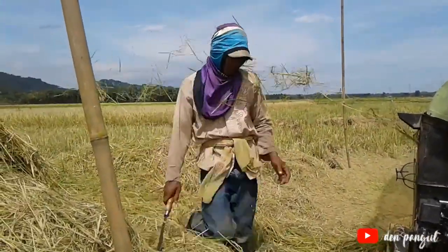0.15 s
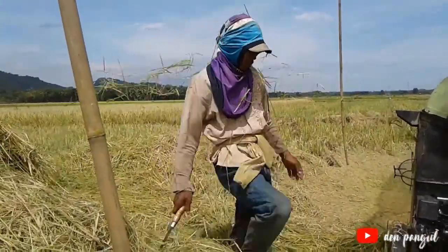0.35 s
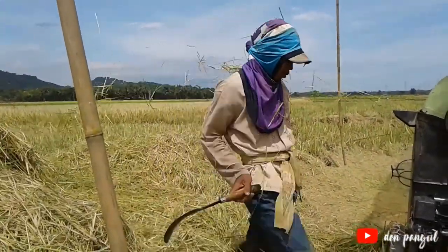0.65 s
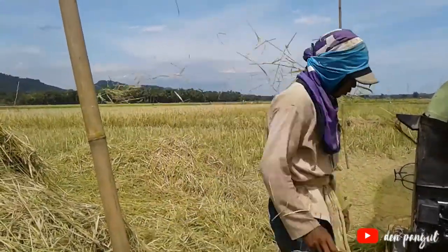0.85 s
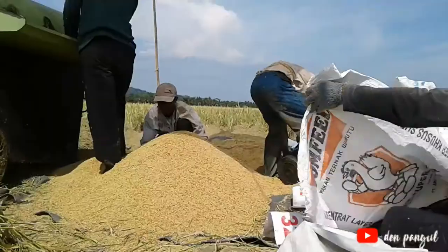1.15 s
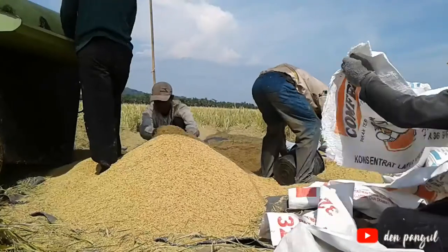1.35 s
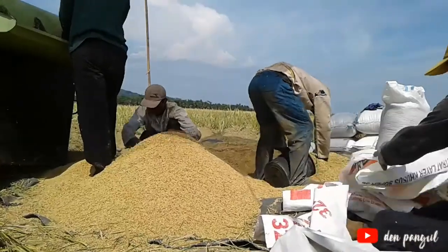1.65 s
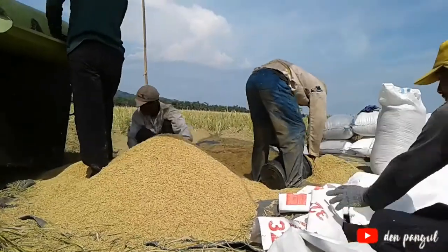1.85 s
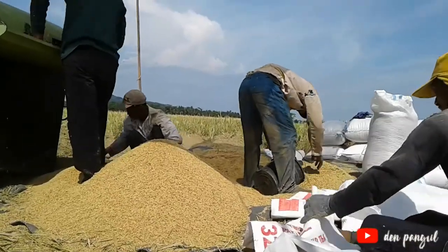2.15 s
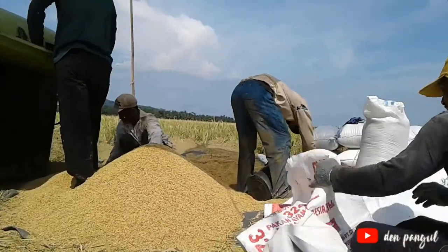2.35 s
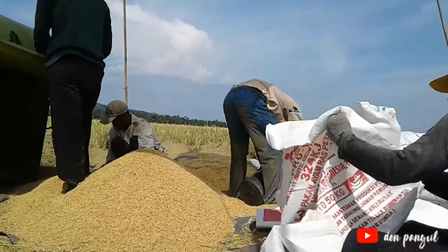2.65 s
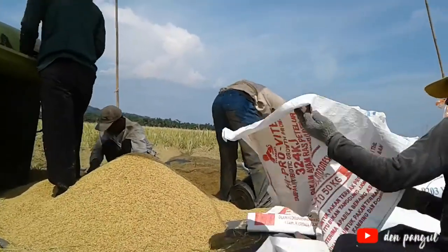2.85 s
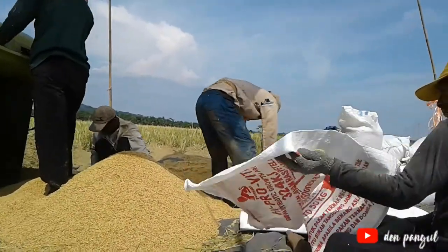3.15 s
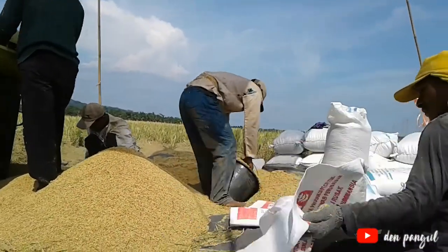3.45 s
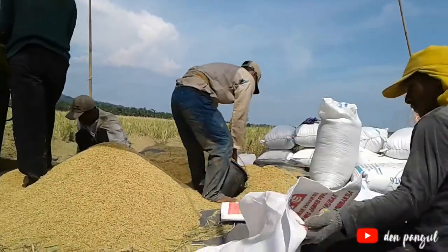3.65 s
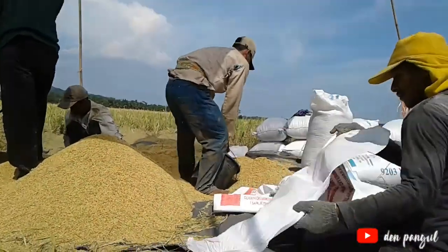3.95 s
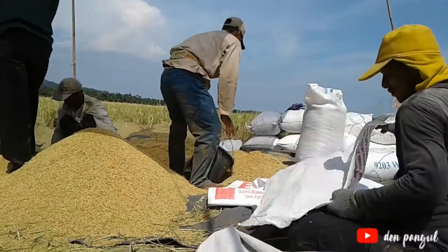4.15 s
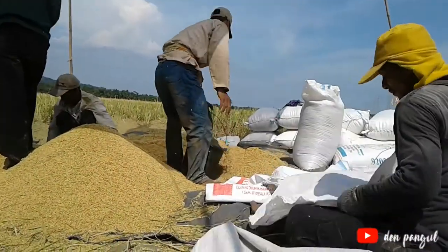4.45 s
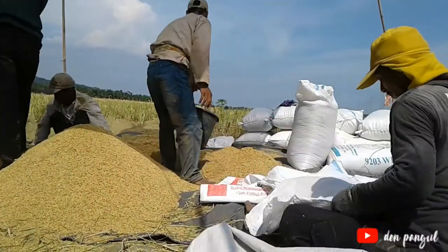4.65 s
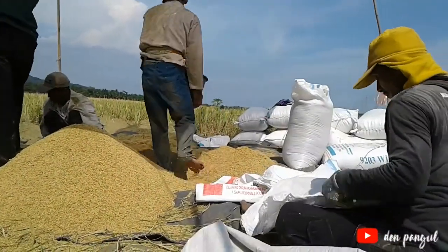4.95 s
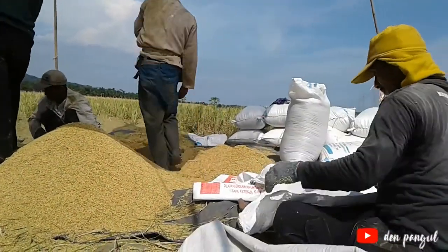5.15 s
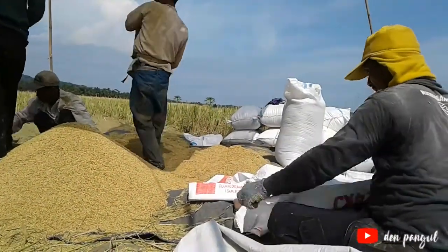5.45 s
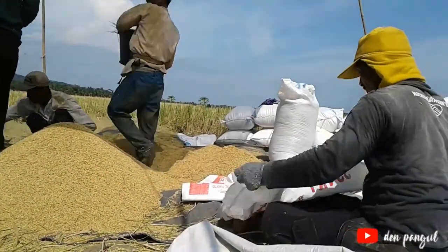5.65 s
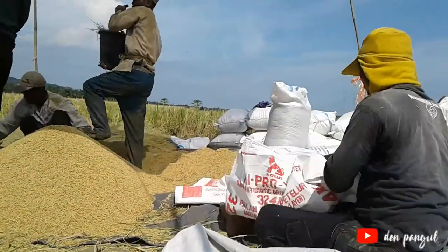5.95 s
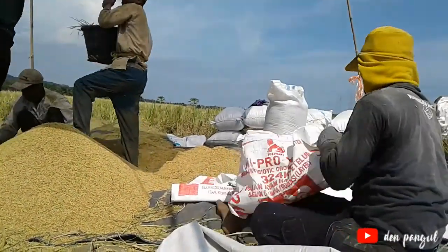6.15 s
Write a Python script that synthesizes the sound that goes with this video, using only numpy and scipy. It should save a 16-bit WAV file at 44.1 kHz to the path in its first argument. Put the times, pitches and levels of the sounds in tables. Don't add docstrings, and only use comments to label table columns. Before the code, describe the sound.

Loud engine-driven thresher rattles and clanks beside the straw outlet, stops dead, then returns as a steadier distant drone with pouring grain and plastic sack crackle.

```python
import sys
import numpy as np
from scipy import signal
from scipy.fft import rfft, irfft, next_fast_len
from scipy.io import wavfile
from scipy.ndimage import uniform_filter1d, map_coordinates

SR = 44100
rng = np.random.default_rng(int(sys.argv[2]) if len(sys.argv) > 2 else 0)


def store_wav(level_fs):
    pcm = np.round(np.clip(np.atleast_2d(level_fs), -1, 1) * 32767)
    wavfile.write(sys.argv[1], SR, pcm.T.astype(np.int16))


def natural_amplitude(level_db):
    exponent = np.asarray(level_db, float) / 20
    return 10 ** exponent


N = 277830
TIME = np.arange(N) / SR

# shaft_multiple, level_db
NEAR_ORDERS = [(1, -39), (2, -30), (3, -26.5), (4, -24.5), (5, -4), (6, -2.5), (7, -5), (8, 3.5), (9, -4),
               (10, 0.5), (11, -9.5), (12, -5), (13, -24.5), (14, -13), (15, -0.5), (16, -3.5), (17, -6),
               (18, -9), (19, -1), (20, -11), (21, -2), (22, -12), (23, 3.5), (24, -16)]
FAR_ORDERS = [(1, -42.5), (2, -36), (3, -26), (4, -21.5), (5, -17.5), (6, -9), (7, -4), (8, 0), (9, -14),
              (10, 2.5), (11, -2), (12, -2), (13, -8.5), (14, -9.5), (15, -17), (16, -11), (17, -14),
              (18, -11.5), (19, -27), (20, -11), (21, -21)]
FAR_HALF_ORDERS = [(0.5, -42), (1.5, -41), (2.5, -37), (3.5, -32), (4.5, -19), (5.5, -18.5), (6.5, -9),
                   (7.5, -4.5), (8.5, -6.5), (9.5, 0.5), (10.5, -2), (11.5, -13), (12.5, -13),
                   (13.5, -12.5), (14.5, -18), (15.5, -12), (16.5, -20), (17.5, -11), (18.5, -9),
                   (19.5, -12), (20.5, -18)]
# frequency_hz, density_db_per_hz
NEAR_ROAR = [(12, -70.5), (20, -39), (48, -29), (65, -14.5), (124, -2), (173, -10.5), (241, -3),
             (323, -5.5), (379, -2.5), (507, -10.5), (650, -17.5), (840, -46.5), (1430, -120)]
FAR_ROAR = [(12, -69), (20, -39), (54, -39), (73, -20), (93, -8.5), (151, -3.5), (181, -5.5), (205, -12.5),
            (264, -10), (307, -13), (343, -14.5), (429, -19.5), (550, -28), (720, -40), (1210, -120)]
OUTLET = [(250, -62.5), (330, -18), (370, -9), (388, -5), (410, -14.5), (470, -15.5), (600, -44.5)]
# frequency_hz, density_db_per_hz
NEAR_RATTLE = [(350, -31.5), (600, -14), (637, -10.5), (697, -4.5), (763, -7.5), (822, -2.5), (1160, -2.5),
               (1240, -5), (1410, -10), (1610, -5), (2020, -9), (2350, -4), (2530, -9), (3120, -12),
               (3600, -20.5), (4680, -45.5), (7920, -120)]
FAR_RATTLE = [(250, -120), (400, -33), (520, -3), (700, -1.5), (960, -1.5), (1350, -0.5), (1700, 2),
              (2230, 1.5), (2500, -6), (3000, -12), (3300, -43), (4500, -120)]
# frequency_hz, density_db_per_hz
NEAR_CHAFF = [(2000, -36), (3400, -3.5), (4020, -3.5), (4360, 1.5), (4710, -5.5), (5190, -0.5),
              (5710, -10.5), (6370, -5), (7470, -7.5), (8070, -3.5), (8820, -1.5), (9840, -7),
              (11300, -25.5), (13600, -8.5), (15700, -10.5)]
FAR_CHAFF = [(1710, -29), (2900, -3), (3300, -0.5), (3530, -3.5), (3870, -5.5), (4420, -1), (7120, -7.5),
             (8250, -4), (9380, -7), (11100, -22.5), (12500, -22), (16200, -46.5), (22000, -120)]
# frequency_hz, density_db_per_hz
SACK = [(7000, -120), (10500, -15), (11500, -17.5), (12300, -14), (13500, -4.5), (14800, 0), (15150, 1.5),
        (15400, -0.5), (16400, -5)]
SHAKEN_SACK = [(6000, -120), (7600, -40), (8200, -3), (8600, 0), (9000, -9), (9600, -42), (12000, -120)]
WEAVE = [(13800, -120), (14700, -30), (15000, -3), (15150, 0), (15300, -4), (15600, -30), (16500, -120)]
# time_s, shaft_hz, load_db
NEAR_LOAD = [
    (0, 17.6, 0.5),
    (.2, 17, 1),
    (.58, 16.3, 1.5),
    (.66, 16.5, -0.5),
    (.85, 16.5, 0),
    (1.04, 17.4, -1.5),
]
# time_s, shaft_hz
FAR_SHAFT = [(1.4, 15.2), (3.3, 14.75), (4.5, 14.85), (6.3, 14.75)]
# time_s, roar_db
FAR_LOAD = [
    (1.4, -15),
    (2.3, -15.5),
    (3.3, -15),
    (3.45, -16.5),
    (3.7, -15),
    (4.5, -14.5),
    (5.5, -14.5),
    (5.85, -13),
    (6.05, -16),
    (6.3, -14),
]
# time_s, flow_db
FLOW = [(1.66, -29.5), (1.85, -28.5), (2.1, -30.5), (2.48, -29), (2.65, -30), (3.3, -30), (3.9, -29),
        (4.15, -28), (4.4, -29), (4.7, -26.5), (4.85, -29), (5.2, -28), (5.35, -29), (5.5, -27.5),
        (5.85, -29.5), (6.3, -28.5)]
# start_s, peak_db
TICKS = [(0.11, -15), (0.168, -15), (0.2284, -24), (0.3471, -19), (0.408, -14), (0.5896, -17),
         (0.6517, -9.5), (0.697, -23), (0.761, -20), (0.834, -10), (0.8959, -15), (0.9567, -11),
         (1.0171, -17)]
# frequency_hz, level_db
TICK = [(800, -120), (2000, -44), (3000, -14), (6000, -18), (7700, -13), (8700, 0), (9700, -9),
        (11500, -31), (14500, -14.5), (16000, -16.5)]
# start_s, peak_db, middle_mode_db, upper_mode_db
CLANKS = [(0.301, -18, -10, 3), (0.359, -14, -10, -8), (0.393, -11.5, -12, -8), (0.4495, -15.5, -15, -2),
          (0.5147, -15.5, -13, -17), (0.636, -11, 3, -2), (0.6985, -13.5, 1, -7), (0.7619, -23.5, -7, -4.5),
          (0.8217, -12, -9, -3.5), (0.882, -8.5, -7, -4.5), (0.942, -10, -2, -2.5),
          (1.0102, -14, -4.5, -8.5)]
# frequency_hz, t60_s
PLATE = [(1165, 0.034), (1520, 0.031), (2300, 0.033)]
# start_s, peak_db
SNAPS = [(1.6911, -24), (1.8368, -19), (1.9535, -24), (2.1526, -18), (2.198, -23.5), (2.8151, -19),
         (2.9208, -18.5), (3.0321, -21), (3.2341, -18), (3.3843, -17), (3.4232, -18), (3.502, -24),
         (3.5624, -25), (3.6143, -24), (3.6796, -28), (3.7614, -22), (3.8263, -21), (4.0248, -24),
         (4.163, -25), (4.4319, -27), (4.6529, -23), (5.3099, -24), (5.5124, -21), (6.1405, -25)]
# early_hz, late_hz, width_hz, depth_db
NOTCHES = [(125, 123, 11, 5.5), (248, 244, 6.6, 5), (350, 345, 27, 3), (523, 553, 59, 9.5),
           (1083, 1190, 160, 9.5), (1484, 1313, 90, 4), (1843, 2028, 128, 12.5), (2340, 2520, 97, 4),
           (2648, 2915, 135, 9.5), (3665, 4900, 270, 0.5), (6000, 6730, 900, 2), (10600, 12000, 1300, 1)]
# frequency_hz, width_hz, lift_db
PANELS = [(686, 46, 1.5), (966, 51, 5), (1330, 58, 6), (1696, 55, -1), (2240, 76, 2), (451, 92, 4.5)]
# time_s, path_share
SETTLE = [
    (1.6, 0),
    (2.6, 0.4),
    (3.3, 0.96),
    (6.3, 0.8),
]
# time_s, gain
FADE = [
    (1.381, 0),
    (1.5, 0.29),
    (1.66, 0.82),
]

CUT_S = 1.04192
EMPTY_RATTLES = 0.3


def unit(x):
    return x / np.sqrt(np.mean(x ** 2) + 1e-20)


def curves(rows):
    time_s, *columns = np.transpose(rows)
    return [np.interp(TIME, time_s, column) for column in columns]


def wobble(rate):
    knots = rng.standard_normal(int(N * rate / SR) + 4)
    return map_coordinates(knots, [TIME * rate])


def coloured(x, spectrum):
    size = next_fast_len(N + 8192)
    hz, db = np.transpose(spectrum)
    log_hz = np.log(np.fft.rfftfreq(size, 1 / SR) + 1)
    gain = natural_amplitude(np.interp(log_hz, np.log(hz), db))
    return irfft(rfft(x, size) * gain, size)[:N]


def rush(spectrum, patchy_db, flutter_db, rate):
    z = signal.stft(rng.standard_normal(N), nperseg=512)[2]
    field = uniform_filter1d(rng.standard_normal(z.shape), size=12, axis=0)
    field = uniform_filter1d(field, size=10, axis=1)
    noise = signal.istft(z * natural_amplitude(patchy_db * unit(field)), nperseg=512)[1][:N]
    return unit(coloured(noise * natural_amplitude(flutter_db * wobble(rate)), spectrum))


def shaft(speed_hz, orders, drift, waver_db):
    turn = 2 * np.pi * np.cumsum(speed_hz) / SR
    hum = np.zeros(N)
    for order, db in orders:
        blur = drift * wobble(2.5) * (2.6 if order % 1 else 1)
        start = 2 * np.pi * rng.random()
        hum += natural_amplitude(db + waver_db * wobble(3.6)) * np.sin(order * turn + start + blur)
    return unit(hum)


def near_drum(speed_hz, load_db):
    hum = natural_amplitude(-3.5) * shaft(speed_hz, NEAR_ORDERS, drift=0.66, waver_db=2.5)
    roar = natural_amplitude(-1.5) * rush(NEAR_ROAR, patchy_db=0.5, flutter_db=0.5, rate=34)
    chute = natural_amplitude(-9) * rush(OUTLET, patchy_db=2.5, flutter_db=1.5, rate=13)
    return natural_amplitude(-15.4 + load_db) * (hum + roar + chute)


def near_rattle_and_chaff(speed_hz, load_db):
    throb = np.cos(2 * np.pi * (np.cumsum(speed_hz) / SR + 0.16))
    empty_db = -EMPTY_RATTLES * load_db
    rattle = rush(NEAR_RATTLE, patchy_db=0.26, flutter_db=0.5, rate=83)
    chaff = rush(NEAR_CHAFF, patchy_db=0.9, flutter_db=1.3, rate=240)
    return natural_amplitude(-19 + empty_db + throb) * rattle + natural_amplitude(-25 + empty_db + 1.4 * throb) * chaff


def taps(events, colour, lift_db, rise, t60):
    out, t = np.zeros(N + SR), np.arange(SR // 20) / SR
    for start_s, db in events:
        envelope = natural_amplitude(db + lift_db - 60 * t / t60) * (1 - np.exp(-t / rise))
        out[round((start_s - rise) * SR):][:len(t)] += envelope * rng.standard_normal(len(t))
    return coloured(out[:N], colour)


def plate():
    out, t = np.zeros(N + SR), np.arange(SR // 10) / SR
    scrape_band = signal.butter(2, [900 / SR * 2, 2600 / SR * 2], "band")
    for start_s, db, middle_db, upper_db in CLANKS:
        scrape = signal.lfilter(*scrape_band, rng.standard_normal(len(t)))
        ring = 0.5 * natural_amplitude(-60 * t / 0.03) * scrape
        for level_db, (hz, t60) in zip((0, middle_db, upper_db), PLATE):
            mode = np.sin(2 * np.pi * hz * rng.normal(1, 0.008) * t)
            ring += natural_amplitude(level_db - 60 * t / t60) * mode
        strength_db = 1.5 * (db + 8.5) + 5.0
        rise = 1 - np.exp(-t / 0.0076)
        out[round((start_s - 0.0025) * SR):][:len(t)] += natural_amplitude(strength_db) * ring * rise
    return out[:N]


def near():
    speed_hz, load_db = curves(NEAR_LOAD)
    ticks = taps(TICKS, TICK, lift_db=13.5, rise=0.0009, t60=0.021)
    return near_drum(speed_hz, load_db) + near_rattle_and_chaff(speed_hz, load_db) + ticks + plate()


def far_drum():
    speed_hz, = curves(FAR_SHAFT)
    roar_db, = curves(FAR_LOAD)
    hum = natural_amplitude(-0.5) * shaft(speed_hz, [*FAR_ORDERS, *FAR_HALF_ORDERS], drift=0.6, waver_db=1.3)
    roar = natural_amplitude(-3.0) * rush(FAR_ROAR, patchy_db=0.27, flutter_db=0.5, rate=68)
    return natural_amplitude(roar_db) * (hum + roar)


def grain_flow():
    flow_db, = curves(FLOW)
    return flow_db - flow_db.mean() + 0.53 * wobble(14)


def far_rattle_and_grain(flow_db):
    rattle = rush(FAR_RATTLE, patchy_db=0.67, flutter_db=0.72, rate=63)
    grain = rush(FAR_CHAFF, patchy_db=0.5, flutter_db=0.78, rate=150)
    return natural_amplitude(-19 + 0.42 * flow_db) * rattle + natural_amplitude(-26.5 + flow_db) * grain


def echoes(x):
    hz, t, z = signal.stft(x, SR, nperseg=4096)
    share = np.interp(t, *np.transpose(SETTLE))

    def bump(centre, width):
        return 1 / (1 + ((hz[:, None] - centre) / width) ** 2 * 4)

    loss_db = sum(depth_db * bump(early + (late - early) * share, width)
                  for early, late, width, depth_db in NOTCHES)
    lift_db = sum(db * bump(centre, width) for centre, width, db in PANELS)
    return signal.istft(z * natural_amplitude(lift_db - loss_db), SR, nperseg=4096)[1][:N]


def sacks(flow_db):
    rustle_db = -26 + 1.4 * flow_db - 1.7 * (TIME - FADE[-1][0])
    rustle = natural_amplitude(rustle_db) * rush(SACK, patchy_db=0.0, flutter_db=1.7, rate=70)
    shake_db = -34.5 - 18 * np.maximum(TIME - 2.4, 0)
    shake = natural_amplitude(shake_db) * rush(SHAKEN_SACK, patchy_db=1.2, flutter_db=-1.0, rate=61)
    weave_db = -39 + flow_db - 11 * np.maximum(TIME - 3.5, 0)
    weave = natural_amplitude(weave_db) * rush(WEAVE, patchy_db=2.0, flutter_db=1.2, rate=30)
    snaps = taps(SNAPS, SACK, lift_db=7.0, rise=0.004, t60=0.06)
    return rustle + shake + weave + snaps


def far():
    flow_db = grain_flow()
    return echoes(far_drum() + far_rattle_and_grain(flow_db)) + sacks(flow_db)


def levelled(x):
    squeeze, span_s, lag_s = 0.23, 0.033, 0.0023
    span = round(span_s * SR / 2)
    power = uniform_filter1d(uniform_filter1d(x ** 2, size=span), size=span)
    delayed = np.abs(np.roll(power, round(lag_s * SR)))
    swell_db = 10 * np.log10(delayed / np.mean(x ** 2) + 1e-3)
    return x * natural_amplitude(-squeeze * swell_db)


def scene():
    first = levelled(near()) * (TIME < CUT_S)
    second = levelled(far()) * curves(FADE)[0]
    return (first + second)[None]


def low_pass(x):
    return signal.sosfilt(signal.butter(12, 16970, fs=SR, output="sos"), x)


def record(dry):
    top_hz, edge_hz = 15775, 50
    soft = dry / (1 + np.abs(dry / 1.05) ** 6) ** (1 / 6)
    below_top = np.clip((top_hz - np.fft.rfftfreq(N, 1 / SR)) / edge_hz, 0, 1)
    passed = np.sin(np.pi / 2 * below_top) ** 2
    mix = irfft(rfft(soft) * passed, N)
    return low_pass(mix)


dry = scene()
out = record(dry)
store_wav(out)
```